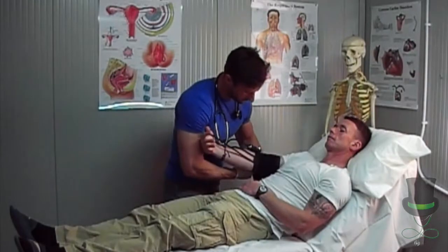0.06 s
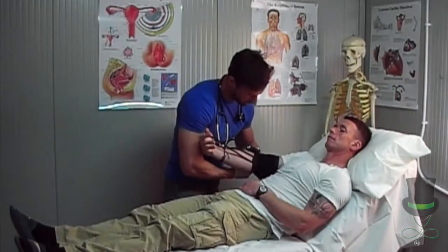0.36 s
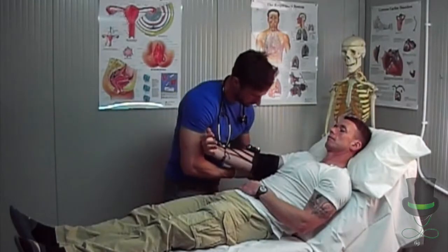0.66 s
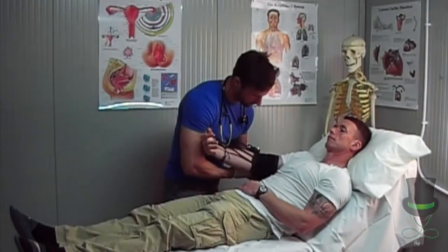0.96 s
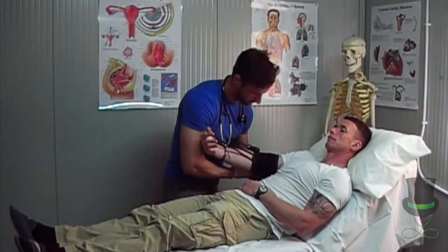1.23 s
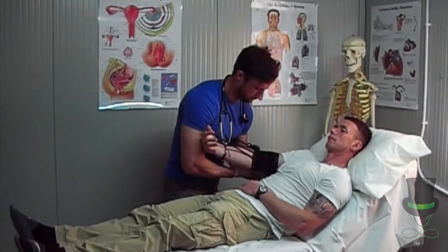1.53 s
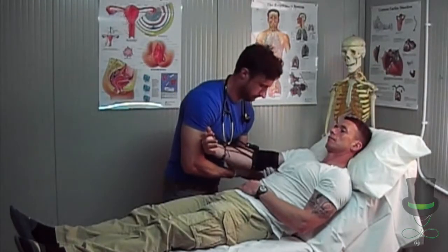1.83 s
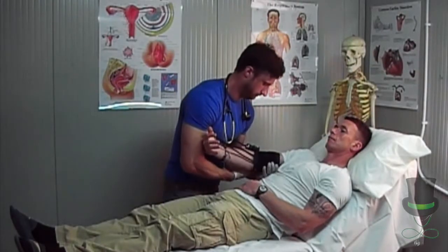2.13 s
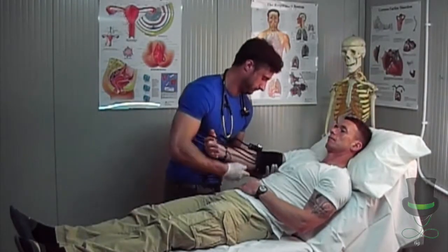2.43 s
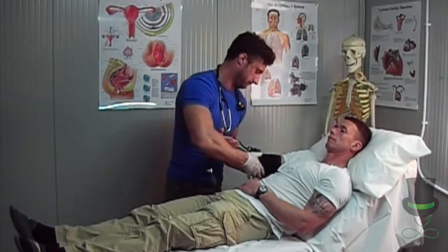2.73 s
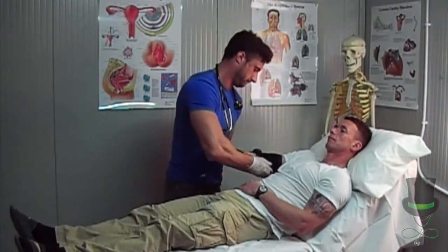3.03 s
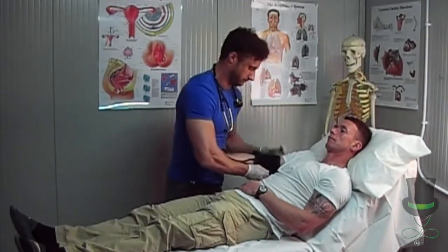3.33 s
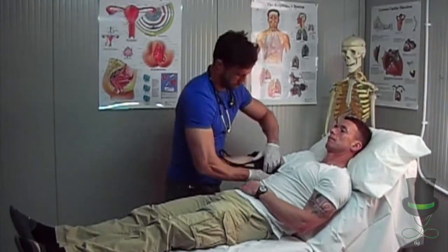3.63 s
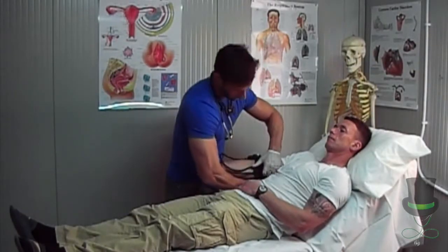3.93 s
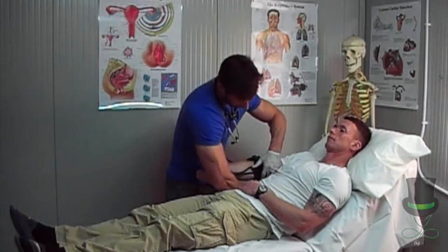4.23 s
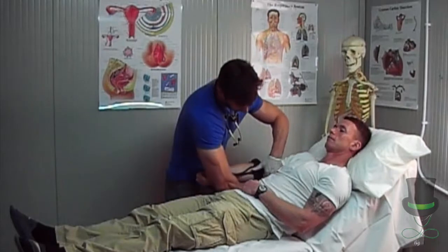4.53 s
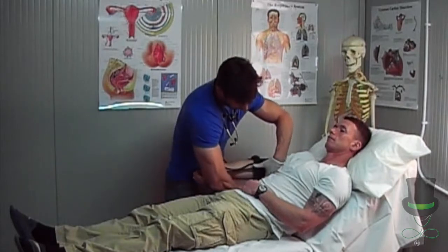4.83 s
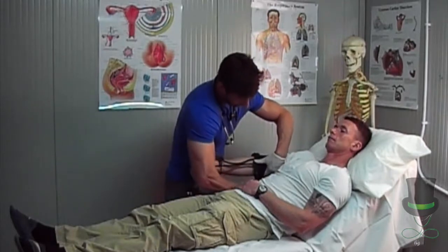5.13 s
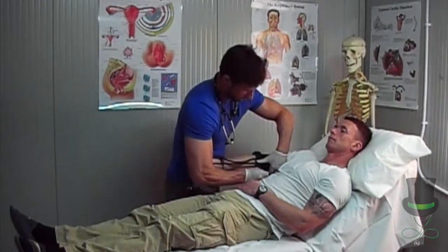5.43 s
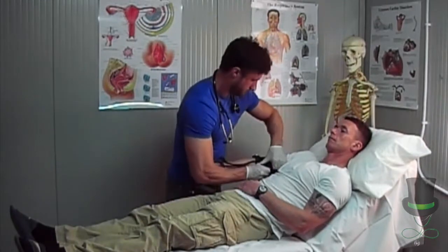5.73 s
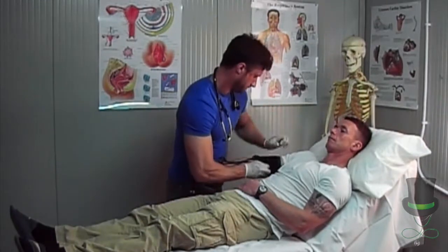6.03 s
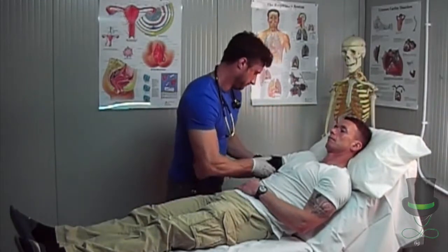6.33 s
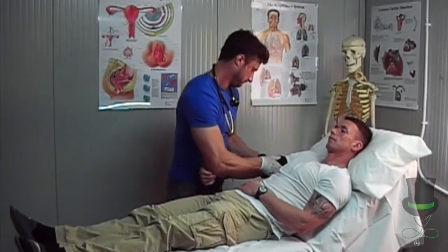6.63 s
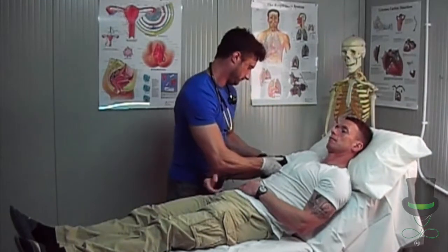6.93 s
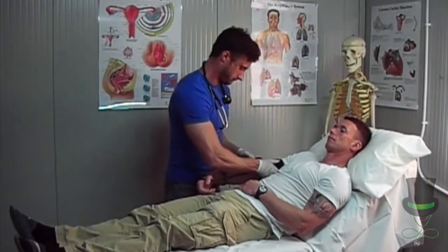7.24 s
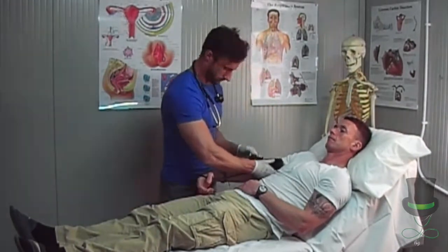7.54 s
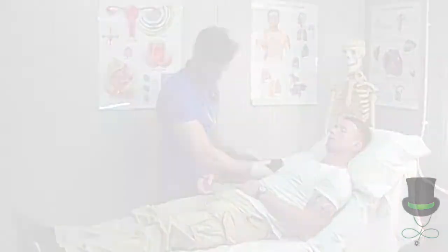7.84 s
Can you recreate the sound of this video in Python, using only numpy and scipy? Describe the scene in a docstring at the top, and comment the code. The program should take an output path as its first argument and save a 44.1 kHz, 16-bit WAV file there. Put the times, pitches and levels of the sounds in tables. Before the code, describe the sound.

A stiff fabric cuff is handled close by in a small, quiet room, over a low rumble. Light rustles and clicks build to sharp, scratchy rubs and snapping folds around 0.8 to 1.3 seconds, the loudest handling, with brief squeaks. Another crisp rub comes near 1.8 seconds, then smaller rustles, ticks and faint knocks continue until about 3.5 seconds. The rumble sinks away as the hook-and-loop strip starts to peel in short crackling tugs from 3.6 seconds. These merge into one longer, slightly hollow rip from about 4 to 4.7 seconds, with a last tug near 5 seconds. Around 5.8 to 6.1 seconds the flap scrapes twice over the hooks. The rumble returns near 6.4 seconds with more light rustling, a couple of small snaps and a soft knock at 6.8 seconds. Faint cloth movements trail off by 8 seconds.

```python
"""Hook-and-loop cuff in a small bare room

A stiff fabric cuff is handled on an arm: friction makes the cloth rustle and squeak, its folds
buckle with a snap or ping, and the arm knocks softly. The strip is peeled in a few tugs and one
long rip, the released hooks plucking the taut flap, which is then drawn round again.
A low room rumble lies underneath and sinks for a while around the rip."""
import sys
import numpy as np
from scipy import signal
from scipy.fft import rfft, irfft, next_fast_len
from scipy.io import wavfile
from scipy.ndimage import uniform_filter1d

SR = 44100
rng = np.random.default_rng(int(sys.argv[2]) if len(sys.argv) > 2 else 0)


def bounce(signal):
    """Save signal as a 16-bit WAV file at the path given by the first command-line argument."""
    frames = np.transpose(np.atleast_2d(signal))
    limited = np.clip(frames, -1, 1)
    pcm = np.round(limited * 32767).astype(np.int16)
    wavfile.write(sys.argv[1], SR, pcm)


N = 355975
TIME, FREQS = np.arange(N) / SR, np.fft.rfftfreq(N, 1 / SR)

# Levels in the tables are relative; each source applies its own gains.
# Course of the room rumble: time_s, level_db
RUMBLE_LEVELS = [(0, -64), (1.8, -63.5), (2.2, -69.5), (3.3, -66.5), (3.55, -84), (6.25, -81), (6.48, -66),
                 (8.07, -68)]
# Reverberation time of the room: frequency_hz, t60_s
REVERB_TIMES = [(200, 0.38), (800, 0.14), (2100, 0.17), (5500, 0.13), (10000, 0.097), (15000, 0.21)]
# Stereo width: frequency_hz, side_gain_db
SIDE_GAINS = [(100, -22.5), (400, -15.5), (2500, -24), (4400, -11), (6500, -8.5), (10000, -1),
              (14000, -4.5)]
# Stereo balance: frequency_hz, left_over_right_db
BALANCE = [(130, 2.), (400, 1), (4000, -0.15), (8000, -0.7), (12000, -1.5)]
# Spectral envelopes: frequency_hz, level_db
RUMBLE_SPECTRUM = [(15, -65), (25, -19), (59, -29.5), (113, -5), (145, -3), (168, 2.5), (183, 0.5),
                   (205, -8.5), (248, -11), (352, -22.5), (394, -24.5), (425, -35), (500, -40),
                   (650, -68.5), (1100, -120)]  # low room noise
AIR_SPECTRUM = [(200, -12.5), (400, -1), (770, -8.5), (834, 9.5), (910, -6.5), (1500, 0), (2100, -4),
                (4200, -8.5), (9000, -7.5), (12000, -17), (15500, -48.5)]  # faint room hiss
WEAVE_SPECTRUM = [(100, -74), (400, -32.5), (1200, -23.5), (2500, -9), (4000, 0.5), (6500, 2), (9500, 2.5),
                  (12500, -6), (15500, -29.5)]  # rubbed threads
FOLD_SPECTRUM = [(300, -39), (600, -14), (1000, -8), (1500, -1), (2300, -0.5), (3000, -1), (4500, -15.5),
                 (9000, -55.5)]  # stiff folds creasing
CRACK_SPECTRUM = [(100, -64.5), (400, -43.5), (800, -33), (1400, -18), (4000, 3.5), (9000, 12.5),
                  (12500, -4), (15500, -17.5)]  # a fold giving way
SCRAPE_SPECTRUM = [(300, -37), (900, -16), (1400, -11), (3000, -0.5), (6000, -0.5), (9500, 3.5),
                   (12500, -6.5), (15500, -36)]  # cloth skimming the hooks
HOLLOW_SPECTRUM = [(200, -38), (420, -24), (620, -11), (850, 7), (1150, 7), (1600, 2), (4000, -48)]  # the sliding flap
RASP_SPECTRUM = [(60, -57.5), (300, -50), (700, -17.5), (1400, 8), (2300, 6), (4000, 6), (7000, 5),
                 (9500, 3), (12500, -6.5), (15500, -35.5)]  # hooks letting go
FLAP_SPECTRUM = [(50, -53.5), (140, -31.5), (300, -18), (420, -10), (640, 6), (900, -9), (1050, -6),
                 (1600, -28.5), (4000, -51.5)]  # the taut flap
# Soft knocks of the arm and cuff: start_s, level_db, pitch_hz, decay_s
KNOCKS = [(1.41, -53.5, 420, 0.0031), (1.721, -54, 172, 0.031), (2.466, -53.5, 171.4, 0.014),
          (4.253, -56.5, 225, 0.012), (4.323, -59.5, 209, 0.012), (4.54, -55, 168, 0.0077),
          (6.813, -44.5, 167, 0.014)]
# Faint motion of the cloth under the hands: start_s, end_s, weave_db, folds_over_weave_db
CLOTH_STIRS = [(0, 2.2, -63, -1), (2.2, 3.64, -68.5, 0), (6.45, 8.07, -86, -2)]
# Strokes of cloth on cloth and skin: start_s, length_s, swell_s, weave_db, folds_over_weave_db
CLOTH_STROKES = [(0.0, 0.032, 0.038, -49.5, -30), (0.168, .035, 0.012, -56.5, -38),
                 (0.225, 0.09, 0.012, -51, -30), (0.343, 0.025, 0.0026, -50, -1.5),
                 (0.408, 0.094, 0.0027, -47, 5.5), (0.572, 0.062, 0.0034, -44, 3),
                 (0.776, 0.042, 0.004, -24.5, -14), (0.876, 0.019, 0.0092, -42.5, -25),
                 (0.899, 0.04, .003, -28, 0.5), (0.958, 0.046, 0.0056, -20.5, -20),
                 (1.045, 0.021, 0.028, -17, -13.5), (1.18, 0.1, 0.095, -38.5, 4.5),
                 (1.35, 0.11, 0.023, -71.5, 22), (1.46, 0.072, 0.0083, -46, -1),
                 (1.545, 0.045, 0.0086, -55, 11.5), (1.688, 0.015, 0.0045, -58, 9),
                 (1.745, 0.018, .025, -46, 5), (1.831, 0.033, 0.044, -25.5, -26),
                 (1.95, 0.068, 0.01, -56.5, 12.5), (2.13, 0.067, 0.0057, -51, 6.5),
                 (2.333, 0.029, 0.011, -42, 1.5), (2.385, 0.041, 0.0066, -48.5, 6),
                 (2.69, 0.014, 0.009, -35.5, -8), (2.785, 0.023, 0.01, -33, -14),
                 (2.84, 0.074, .02, -50.5, 4.5), (2.95, 0.092, 0.0073, -62, 5.5),
                 (3.33, 0.023, 0.0088, -56.5, -9), (3.466, 0.0076, .007, -42.5, -21),
                 (5.29, 0.033, 0.021, -57.5, -2.5), (5.38, 0.052, 0.0084, -61, -5.5),
                 (5.57, 0.15, 0.05, -60.5, -2), (6.445, 0.064, 0.032, -45.5, -9.5),
                 (6.51, 0.043, 0.028, -46.5, 1), (6.615, 0.037, 0.014, -58, -8),
                 (6.718, 0.039, 0.003, -48, -5), (6.93, 0.019, 0.01, -62.5, -7),
                 (7.066, 0.026, .006, -44, 2.5), (7.33, 0.044, .04, -72, -19.5),
                 (7.56, .14, .12, -65.5, -12), (7.925, 0.024, 0.021, -60.5, 6.5)]
# Finger rubs on the cuff, and brief pitched pings of snapping folds:
# start_s, length_s, level_db, midway_pitch_hz
RUBS_AND_PINGS = [(0.455, 0.06, -48.5, 2700), (0.82, 0.011, -44.5, 807), (0.892, 0.035, -44.5, 755),
                  (1.074, 0.02, -40.5, 1160), (1.224, 0.07, -42, 1880), (1.278, .025, -44, 1170),
                  (1.404, 0.043, -62, 553), (1.671, 0.068, -63.5, 810), (1.957, 0.043, -52, 2750),
                  (2.032, .01, -54, 4540), (2.287, 0.093, -58, 1410), (2.388, 0.037, -51.5, 1050),
                  (3.197, 0.068, -64, 1510), (5.804, 0.097, -57, 1280), (6.008, 0.063, -60, 1100),
                  (6.43, 0.074, -56, 3520), (6.535, 0.03, -59, 1220), (6.715, 0.0123, -37.5, 2340),
                  (6.834, .08, -77, 1900), (6.975, 0.087, -68, 1530), (7.063, 0.0083, -43.5, 4300),
                  (7.416, 0.086, -75.5, 1680), (7.671, 0.025, -61.5, 2795), (8.029, 0.018, -71.5, 1470)]
# Folds that buckle and hooks that catch: start_s, level_db, pitch_hz, ring_over_crack_db
FOLD_SNAPS = [(0.032, -40, 6940, 15), (0.26, -36.5, 7340, 22), (0.344, -34.5, 6900, 4),
              (0.578, -33.5, 3180, -12), (0.624, -25.5, 2520, 35), (0.782, -29, 7950, 18),
              (0.901, -19.5, 2180, 21.5), (0.902, -23, 4240, 9), (1.27, -23, 2080, 27),
              (1.831, -29.5, 8000, 28), (2.032, -34, 4900, 7.5), (2.137, -38.5, 1900, 1.5),
              (2.201, -32, 6660, 3), (2.396, -30.5, 2150, 0), (2.691, -28.5, 2130, -7),
              (2.808, -29.5, 4050, 11), (2.906, -38, 4170, 0), (3.588, -41, 4640, 14),
              (3.77, -31, 2640, 30), (3.938, -41, 4960, 9), (4.968, -27.5, 925, -18),
              (5.144, -37, 5700, 24), (6.718, -29.5, 2370, 5.5), (7.071, -30, 6700, -24)]
# Pulls of the flap over the hooks: start_s, length_s, swell_s, scrape_db, flap_over_scrape_db
FLAP_PULLS = [(5.775, .15, 0.088, -43, -24), (5.95, .11, 0.043, -42, -7.5)]
# Resonances of the taut flap: pitch_hz, bandwidth_hz, lift_db
FLAP_RESONANCES = [(423, 11, 15), (537, 23, 2), (617, 57, 3), (825, 42, 6), (883, 82, 17)]
# Tugs that tear hooks from loops: start_s, length_s, rasp_db, flap_over_rasp_db
PEEL_TUGS = [(3.587, 0.031, -42.5, -71), (3.762, 0.019, -40.5, -44), (3.779, 0.013, -33.5, -15.5),
             (3.863, 0.01, -36.5, -24.5), (3.929, 0.021, -40, -25.5), (3.958, 0.033, -31, -12.5),
             (4.021, 0.015, -31, -3), (4.076, 0.045, -37.5, -9), (4.126, 0.097, -31.5, -5.5),
             (4.23, 0.085, -30.5, -2.5), (4.365, 0.042, -38, -10.5), (4.398, 0.14, -31, -2.5),
             (4.56, 0.08, -41, -4.5), (4.622, 0.018, -32, -1.5), (4.657, 0.011, -53, -26),
             (4.937, .012, -52, -5), (4.953, 0.03, -34, -3), (5.13, 0.005, -45, -18.5)]


def amp(db):
    """Amplitude ratio of a level in decibels."""
    return 10 ** (np.asarray(db) / 20)


def unit(x):
    """Normalisation to an rms of 1."""
    return x / np.sqrt(np.mean(x ** 2) + 1e-20)


def read(points, hz):
    """Interpolation on a logarithmic frequency axis."""
    f, value = np.transpose(points)
    return np.interp(np.log(hz + 1), np.log(f + 1), value)


def colour(x, spectrum):
    """Source-filter shaping: x takes on a spectral envelope, at rms 1."""
    size = next_fast_len(len(x), True)
    gain = amp(read(spectrum, np.fft.rfftfreq(size, 1 / SR)))
    return unit(irfft(rfft(x, size) * gain, size)[:len(x)])


def add(mix, start_s, sound):
    """Superposition of a sound on the mix."""
    part = mix[max(round(start_s * SR), 0):][:len(sound)]
    part += sound[:len(part)]


def wander(rate_hz, shape=N):
    """Random modulation: a band of slow noise around rate_hz."""
    noise = rfft(rng.standard_normal(shape))
    return unit(irfft(noise * FREQS * np.exp(-(FREQS / rate_hz) ** 2), N))


def room_tone(air_db=-7.5, air_side_db=4.5, lumps_db=3.5):
    """Ambient noise, mid and side: an uneven rumble and a faint hiss sink and return together."""
    level_db = np.interp(TIME, *np.transpose(RUMBLE_LEVELS))
    rumble_gain = amp(level_db + lumps_db * wander(rate_hz=6.2))
    return np.array([rumble_gain * colour(rng.standard_normal(N), RUMBLE_SPECTRUM)
                     + amp(level_db + air_db + wide_db) * colour(rng.standard_normal(N), AIR_SPECTRUM)
                     for wide_db in (0, air_side_db)])


def wall_echoes(onset_s=0.00087):
    """Reverberation: two dense tails from close walls, each band decaying exponentially."""
    taps = rng.choice([-1., 1.], (2, SR // 2)) * (rng.random((2, SR // 2)) < 1 / 8)
    taps *= np.clip(TIME[:SR // 2] / onset_s - .5, 0, 1)
    hz, t, bands = signal.stft(taps, SR, nperseg=256)
    decay = amp(-60 * t / read(REVERB_TIMES, hz)[:, None])
    tail = signal.istft(bands * decay, SR, nperseg=256)[1]
    return tail / np.linalg.norm(tail, axis=1, keepdims=True)


def room(direct, moves_per_s=1.311, count=3):
    """Direct and reflected sound, mid and side: the echo paths change as the hands move."""
    places = [np.cos(np.pi * (moves_per_s * TIME + k / count)) * np.sqrt(2 / count)
              for k in range(count)]
    mid, side = sum(signal.oaconvolve((direct * place)[None], wall_echoes(), axes=1)[:, :N]
                    for place in places)
    return np.array([(direct + mid) / np.sqrt(2), side])


def knocks():
    """Padded impact: a low damped vibration swells and dies."""
    out, t = np.zeros(N), TIME[:SR // 4]
    for start, db, hz, decay in KNOCKS:
        envelope = t / decay * np.exp(1 - t / decay)
        add(out, start, amp(db) * envelope * np.sin(2 * np.pi * hz * t))
    return out


def grains(per_s, spread_db):
    """Shot noise: tiny releases of uneven size at random times."""
    size = amp(spread_db * np.minimum(rng.exponential(1, N), 4))
    chance = rng.uniform(-1, 1, N)
    return unit(size * np.sign(chance) * (abs(chance) < per_s / SR))


def friction(clump_db, clump_hz, smooth, per_s=9000, spread_db=3.):
    """Stick-slip friction: contacts let go in clumps over smooth sliding noise."""
    band = np.exp(-(FREQS / clump_hz) ** 2) * np.minimum(FREQS / clump_hz, 1)
    clumps = unit(irfft(rfft(rng.standard_normal(N)) * band, N))
    return (grains(per_s, spread_db) + smooth * rng.standard_normal(N)) * amp(clump_db * clumps)


def crinkle(per_crease_per_s=85., spread_db=2.5, width_at_2khz_hz=270., count=30):
    """Impulse excitation: every slip rings one of many creases, each with its own pitch."""
    slips, crease = grains(per_crease_per_s * count, spread_db), rng.integers(0, count, N)
    out, age = np.zeros(N), np.arange(256)
    for k, hz in enumerate(np.linspace(np.sqrt(500), np.sqrt(15000), count) ** 2):
        width_hz = width_at_2khz_hz * np.sqrt(hz / 2000)
        pole = np.exp((2j * np.pi * hz - np.pi * width_hz) / SR)
        ring = (age * pole ** age).imag
        out += unit(signal.oaconvolve(slips * (crease == k), ring)[:N]) * hz ** .25
    return unit(out)


def strokes(rows, fade_db_per_s, stop_s):
    """Incoherent addition: hand strokes sum in power, giving gains for a layer and its companion."""
    main, companion = np.zeros((2, N))
    for start, length, swell, db, share_db in rows:
        t = TIME[:round((length + stop_s) * SR)]
        after = np.maximum(t - length, 0)
        rise = np.minimum(t / max(swell, .001), 1)
        fall = amp(-fade_db_per_s * after) * np.cos(np.pi / 2 * after / stop_s)
        add(main, start, (rise * fall * amp(db)) ** 2)
        add(companion, start, (rise * fall * amp(db + share_db)) ** 2)
    return np.sqrt([main, companion])


def stirring(uneven_db=5.5):
    """Amplitude modulation by small random movements: gains of the weave and of the folds."""
    drift = np.tanh(wander(rate_hz=4.1, shape=(2, N)))
    gains = sum(amp([[db], [db + share_db]]) * ((TIME >= start) & (TIME < end))
                for start, end, db, share_db in CLOTH_STIRS)
    return uniform_filter1d(gains, size=2048) * amp(uneven_db * drift)


def flexing(x, patchy_db=3.0):
    """Time-varying resonance: bending cloth lifts and dips patches of about 500 Hz by 40 ms."""
    bands = signal.stft(x, nperseg=512)[2]
    patches = uniform_filter1d(rng.standard_normal(bands.shape), size=6, axis=0)
    patches = uniform_filter1d(patches, size=7, axis=1)
    return unit(signal.istft(bands * amp(patchy_db * unit(patches)))[1][:N])


def rustle(crowd_db=-41.5):
    """Frictional excitation: slips sound the folds and, under hard rubbing, crowd into a rasp."""
    weave, folds = np.hypot(strokes(CLOTH_STROKES, fade_db_per_s=262.5, stop_s=0.086), stirring())
    crowded = weave / (weave + amp(crowd_db))
    threads = unit(friction(clump_db=3.5, clump_hz=150, smooth=1.0))
    slips = flexing(np.sqrt(1 - crowded) * crinkle() + np.sqrt(crowded) * threads)
    return (amp(-5) * weave * colour(slips, WEAVE_SPECTRUM)
            + amp(-11) * folds * colour(slips, FOLD_SPECTRUM))


def rubs_and_pings(relative_width=0.4, fall_octaves_per_s=5.1):
    """Driven resonance, gliding down: a rubbing finger's note or a snapping fold's brief ping."""
    out = np.zeros(N)
    slips = friction(clump_db=4.5, clump_hz=150, smooth=0.45, per_s=620, spread_db=6)
    for start, length, db, hz in RUBS_AND_PINGS:
        drive = slips[round(start * SR):][:round(max(length, .01) * SR)]
        pitch = hz * 2 ** (fall_octaves_per_s * (length / 2 - TIME[:len(drive)]))
        carrier = np.exp(2j * np.pi * np.cumsum(pitch) / SR)
        lowpass = signal.butter(4, relative_width * hz / 2, fs=SR)
        note = (carrier * signal.lfilter(*lowpass, drive / carrier)).real  # gliding band-pass
        add(out, start, amp(db) * unit(note * signal.windows.tukey(len(note), .5)))
    return out


def snaps(gain_db=2.0, rise_s=0.00093, decay_s=0.0036, damping=.12):
    """Buckling: a fold gives way with a brief crack and a heavily damped ring at its own pitch."""
    out, t = np.zeros(N), TIME[:2048]
    f = np.fft.rfftfreq(len(t), 1 / SR) + 1
    burst = np.exp(-t / decay_s) * (1 - np.exp(-t / rise_s))
    for start, db, hz, ring_db in FOLD_SNAPS:
        crack, push = burst * rng.standard_normal((2, len(t)))
        crack = colour(np.roll(crack, 32), CRACK_SPECTRUM)
        resonance = 1 / (1 + 1j * (f / hz - hz / f) / (4 * damping)) ** 2
        ring = unit(irfft(rfft(push) * resonance))
        snap = (crack + amp(ring_db) * ring) / np.hypot(1, amp(ring_db))
        add(out, start, amp(db + gain_db) * snap * np.sqrt(np.mean(burst ** 2)))
    return out


def slide():
    """Sliding friction: cloth skims the hooks without catching, a bright scrape over a hollow flap."""
    scrape, flap = strokes(FLAP_PULLS, fade_db_per_s=267.5, stop_s=0.085)
    skims = friction(clump_db=2.5, clump_hz=115, smooth=0.46)
    return (amp(-1.84) * scrape * colour(skims, SCRAPE_SPECTRUM)
            + amp(-8.5) * flap * colour(skims, HOLLOW_SPECTRUM))


def peel(grab_s=0.016, crackle=0.83):
    """Elastic release: each hook that lets go clicks, rings the backing and plucks the taut flap."""
    tugs = [(start, length, grab_s, db, flap_db) for start, length, db, flap_db in PEEL_TUGS]
    rasp, flap = strokes(tugs, fade_db_per_s=201, stop_s=.17)
    releases = unit(friction(clump_db=1.0, clump_hz=110, smooth=0.6))
    releases += crackle * crinkle(per_crease_per_s=220., spread_db=3.5, width_at_2khz_hz=1040.)
    lift_db = sum(db / (1 + (2 * (FREQS - hz) / width) ** 2) for hz, width, db in FLAP_RESONANCES)
    drum = colour(irfft(rfft(releases) * amp(lift_db), N), FLAP_SPECTRUM)
    return amp(-0.82) * rasp * colour(releases, RASP_SPECTRUM) + amp(-4.25) * flap * drum


def scene():
    """Mid-side superposition: left and right agree in the bass and part in the treble."""
    cuff = rustle() + rubs_and_pings() + peel() + slide() + snaps()
    mid, side = room(cuff) + room_tone()
    mid = rfft(mid + knocks())
    side = rfft(side) * amp(read(SIDE_GAINS, FREQS))
    lean = amp(read(BALANCE, FREQS) / 2)
    return irfft(np.array([(mid + side) * lean, (mid - side) / lean]), N)


def record(dry):
    """Band limiting: a steep low-pass filter removes the highest treble."""
    lowpass = signal.firwin(255, cutoff=15650, window=("kaiser", 9), fs=SR)
    return signal.oaconvolve(dry, lowpass[None], "same")


dry = scene()
out = record(dry)
bounce(out)
```